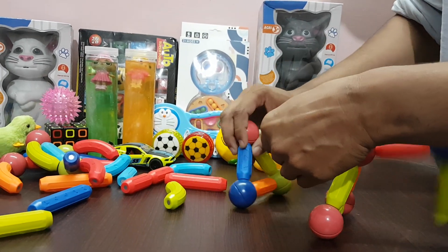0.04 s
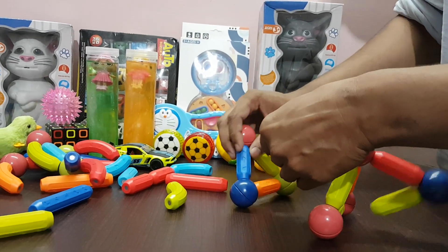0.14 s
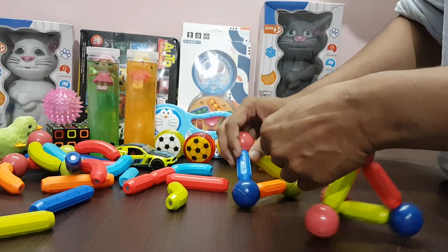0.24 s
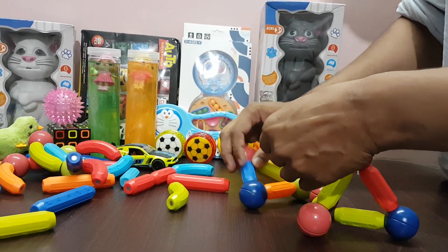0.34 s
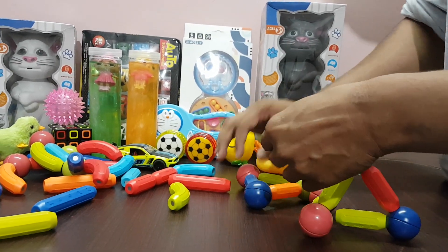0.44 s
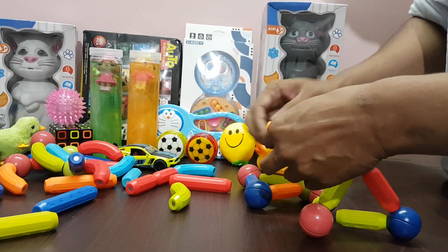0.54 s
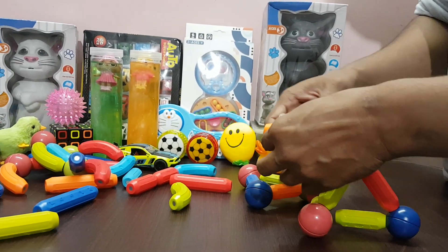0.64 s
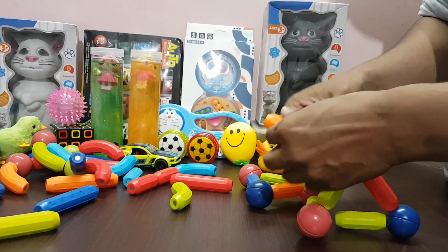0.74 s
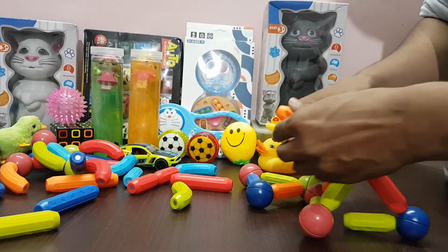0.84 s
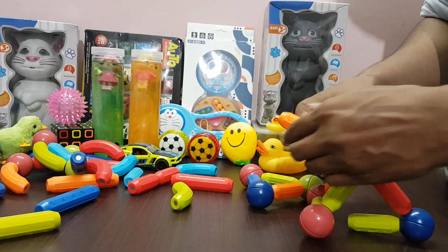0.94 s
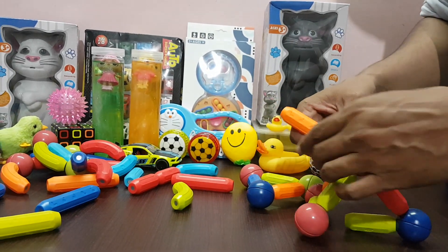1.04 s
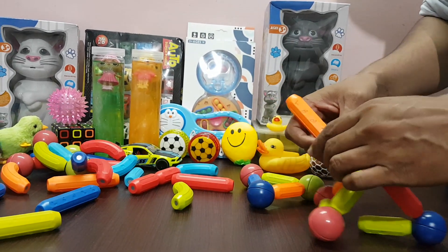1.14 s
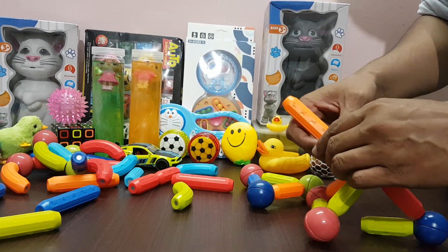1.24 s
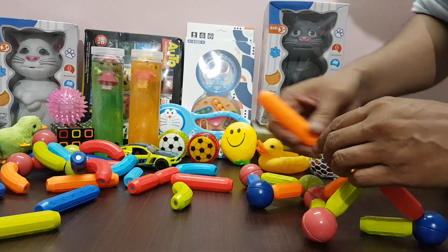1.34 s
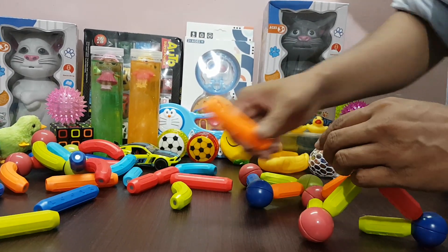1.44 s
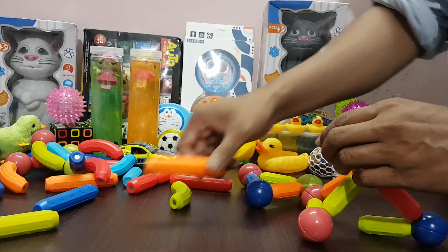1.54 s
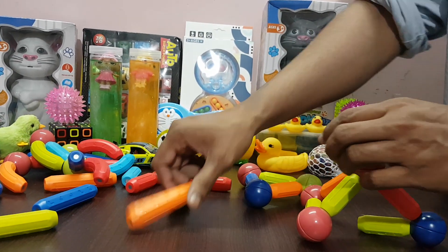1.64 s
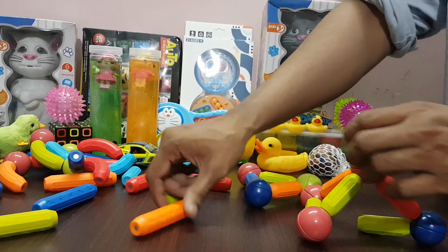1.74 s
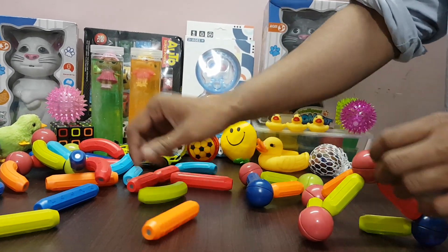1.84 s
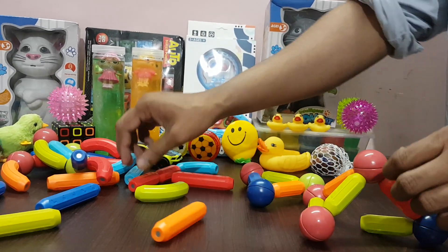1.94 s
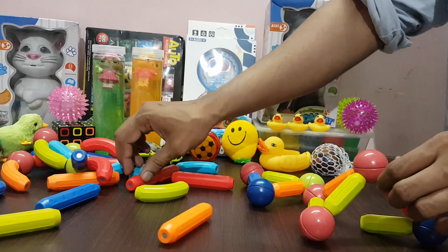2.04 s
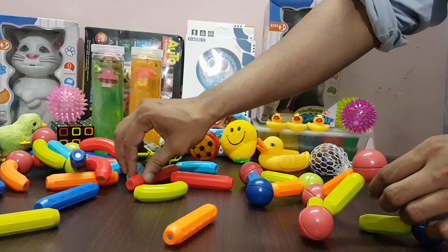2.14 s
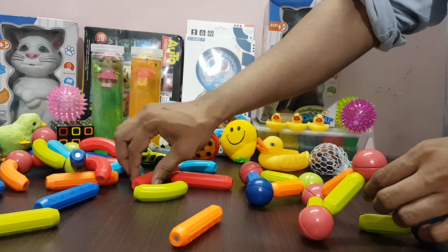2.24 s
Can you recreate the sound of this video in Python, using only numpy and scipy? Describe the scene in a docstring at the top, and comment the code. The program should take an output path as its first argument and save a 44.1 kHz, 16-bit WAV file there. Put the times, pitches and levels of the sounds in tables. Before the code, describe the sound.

Plastic magnetic sticks and balls clack together and knock down on a table. Light ticks and scrapes follow, then a stick drops and bounces with a ping, and more pieces click, close by in a small, faintly humming room.

```python
"""A table in a small room, where hollow plastic sticks and balls with magnets inside are handled.
A frame of them snaps together and knocks down; fingers work a stick loose, it drops, bounces and pings.
Pieces tick and scrape as the hand reaches into the pile, over a faint hum.
Each impact is a noise crack plus ringing modes, each scrape a run of tiny slips; both echo in the room."""
import sys
import numpy as np
from scipy import signal
from scipy.fft import rfft, irfft
from scipy.io import wavfile

SR = 44100
rng = np.random.default_rng(int(sys.argv[2]) if len(sys.argv) > 2 else 0)


def log_audio(samples):
    """Write samples as a 16-bit WAV file to the path given in sys.argv[1]."""
    # one column per channel
    frames = np.atleast_2d(samples).T
    # limit to full scale, then quantise
    limited = np.clip(frames, -1, 1)
    pcm = np.round(limited * 32767).astype(np.int16)
    wavfile.write(sys.argv[1], SR, pcm)


N = 101430

# left-right likeness of the sound field: freq_hz, correlation
COHERENCE = [(60, .99), (180, .94), (350, .85), (700, .7), (1500, .4), (4000, .15), (14000, .2)]


def amp(db):
    """Decibels to gain."""
    return 10 ** (np.asarray(db) / 20)


def unit(x):
    """Scale to rms 1."""
    return x / np.sqrt(np.mean(x ** 2) + 1e-20)


def read(points, hz):
    """Interpolate a table over log frequency."""
    freq_hz, value = np.transpose(points)
    return np.interp(np.log(hz + 1), np.log(freq_hz + 1), value)


def bins(size):
    """Real FFT frequencies in Hz."""
    return np.fft.rfftfreq(size, 1 / SR)


def add(mix, start_s, sound):
    """Mix in a stereo sound, cropped at both ends."""
    at = round(start_s * SR)
    sound = sound[:, max(-at, 0):]
    part = mix[:, max(at, 0):][:, :sound.shape[1]]
    part += sound[:, :part.shape[1]]


def noise_pair(size):
    """Stereo white noise, alike in the bass."""
    left, other = rfft(rng.standard_normal((2, size)))
    likeness = np.clip(read(COHERENCE, bins(size)), 0, 1)
    return irfft([left, likeness * left + np.sqrt(1 - likeness ** 2) * other], size)


def colour(x, gain_db):
    """Minimum-phase filter, one gain per bin."""
    size = x.shape[1]
    cepstrum = irfft(np.log(amp(gain_db)), size)
    cepstrum[..., 1:size // 2] *= 2
    cepstrum[..., size // 2 + 1:] = 0
    return irfft(rfft(x) * np.exp(rfft(cepstrum)), size)


def flatten(x):
    """Whiten the broad spectrum, keep the fine peaks."""
    running_power = np.cumsum((abs(rfft(x)) ** 2).mean(0))
    k = np.arange(len(running_power))
    reach = (k * .08 + 20 * x.shape[1] / SR).astype(int) + 1  # 8 % + 20 Hz each way
    lo, hi = np.maximum(k - reach, 0), np.minimum(k + reach, k[-1])
    mean_power = (running_power[hi] - running_power[lo]) / (hi - lo)
    return colour(x, -10 * np.log10(mean_power + 1e-12))


def hardness_db(low_db, mid_db, treble_db, hz):
    """Hardness of one contact as a smooth gain curve."""
    return read([(250, low_db), (1200, mid_db), (8000, treble_db)], hz)


def background(air_db=-62.5, waver_depth=.25):
    """Soft room air and a wavering low hum."""
    # air spectrum: freq_hz, gain_db
    air = [(20, -15), (60, 0), (100, 4.5), (140, -1), (200, 4.5), (300, -2), (600, -7), (1500, -10),
           (3500, -16.5), (5000, -23), (8000, -22), (9500, -29.5), (16000, -24.5)]
    # hum lines: pitch_hz, level_db
    hum = [(101.5, -60), (202, -68), (258, -69)]
    t, hz = np.arange(N) / SR, bins(N)
    out = amp(air_db) * unit(irfft(rfft(noise_pair(N)) * amp(read(air, hz)), N))
    for pitch_hz, level_db in hum:
        waver = unit(irfft(rfft(rng.standard_normal(N)) * np.exp(-hz / 5), N))
        tone = np.sqrt(2) * np.sin(2 * np.pi * (pitch_hz * t + rng.random()))
        out += amp(level_db) * (1 + waver_depth * waver) * tone
    return out * amp([[-.7], [.7]])


def room(x, onset_s=.011, early_db=-9, early_s=.06, size=32768):
    """Dense echoes off table clutter and walls, each band dying at its own rate."""
    # echo decay: freq_hz, t60_s
    decay = [(70, 0.14), (260, 0.41), (700, 0.31), (1800, 0.26), (5000, 0.28), (13000, .27)]
    # echo spectrum: freq_hz, gain_db
    spectrum = [(70, 2.5), (160, 4.5), (300, 1), (800, -1), (1600, -4.5), (4000, -2), (8000, -7),
                (13000, -8.5)]
    band_hz, frame_s, bands = signal.stft(noise_pair(size), SR, nperseg=256)
    bands = bands * np.exp(-np.log(1000) * frame_s / read(decay, band_hz)[:, None])
    tail = signal.istft(bands, SR, nperseg=256)[1][:, :size]
    t = np.arange(size) / SR
    fade_in = np.clip(2 * t / onset_s - 1, 0, 1)
    early_boost = 1 + amp(early_db) * np.exp(-t / early_s)
    tail = colour(flatten(tail * fade_in * early_boost), read(spectrum, bins(size)))
    return signal.fftconvolve(x, tail, axes=1)[:, :N]


def frame_drags(width_hz=91, size=16384):
    """Friction keeps a low resonance of the pushed frame murmuring."""
    # pushes across the table: start_s, length_s, pitch_hz, level_db
    pushes = [(-.03, 0.25, 280.5, -47.5), (0.218, 0.042, 273, -49), (0.619, 0.27, 265, -58),
              (1.167, 0.19, 319, -54.5), (1.431, 0.091, 400, -58.5)]
    out, t = np.zeros((2, N)), np.arange(size) / SR
    for start_s, length_s, pitch_hz, level_db in pushes:
        resonance = 1 / (1 + (2 * (bins(size) - pitch_hz) / width_hz) ** 2)
        murmur = unit(irfft(rfft(noise_pair(size)) * resonance, size))
        swell = np.sqrt(abs(np.sin(np.pi * np.minimum(t / length_s, 1))))
        add(out, start_s, amp(level_db) * murmur * swell)
    return out


def piece_scrapes(rise_s=.024, fall_s=.0088, slips_per_s=1500, spread_db=2.5, size=32768):
    """Plastic slides on the table and on other pieces in tiny, uneven slips."""
    # slides: start_s, length_s, low_db, mid_db, treble_db
    slides = [(-.02, 0.17, -25.5, -35.5, -56), (0.228, 0.41, -26.5, -43, -51), (.62, 0.3, -32, -42, -69.5),
              (0.913, 0.043, -26.5, -31, -69), (0.867, 0.064, -29.5, -37, -69), (.98, 0.18, -33, -47, -73),
              (1.16, 0.076, -19, -30, -52.5), (1.259, .09, -36, -41.5, -70),
              (1.897, 0.08, -26.5, -31.5, -44), (2.065, 0.039, -38.5, -12.5, -42),
              (2.17, 0.012, -19.5, -24, -54), (2.254, .06, -21.5, -19, -45)]
    # scrape spectrum: freq_hz, gain_db
    spectrum = [(30, -30), (130, -21), (290, -6.5), (500, -7), (900, -7), (1170, -6), (1400, -7),
                (1600, -4.5), (2100, -10.5), (3100, -7.5), (3650, -9), (4300, -14), (7500, -9),
                (10000, -21.5), (16000, -21)]
    out, t, hz = np.zeros((2, N)), np.arange(size) / SR, bins(size)
    for start_s, length_s, low_db, mid_db, treble_db in slides:
        slips = rng.random(size) < slips_per_s / SR
        strength = amp(spread_db * np.minimum(rng.exponential(1, size), 4))
        shell = flatten(noise_pair(size) * np.exp(-t / .002))
        impulses = slips * strength * rng.choice([-1, 1], size)
        grain = unit(irfft(rfft(impulses) * rfft(shell)))
        stroke = np.minimum(t / rise_s, 1) * np.exp(-np.maximum(t - length_s, 0) / fall_s)
        gain_db = read(spectrum, hz) + hardness_db(low_db, mid_db, treble_db, hz)
        add(out, start_s, colour(grain * stroke, gain_db))
    return out * amp([[-1.2], [1.2]])


def crack(rise_s, crack_s, body_s, size, crossover_hz=2780):
    """Dense modes of a hollow shell: the highs die at once, the low body a little later."""
    t, white = np.arange(size) / SR, rfft(noise_pair(size))
    highpass = 1 / (1 + (crossover_hz / (bins(size) + 1)) ** 4)
    top = irfft(white * highpass, size) * np.exp(-t / crack_s)
    body_envelope = (1 - np.exp(-t / rise_s)) * np.exp(-(t / body_s) ** 2)
    body = irfft(white * (1 - highpass), size) * body_envelope
    return flatten(top / np.sqrt(crack_s) + body / np.sqrt(body_s))


def rings(modes, size, detune=.005):
    """Decaying tones of one blow; each blow lands elsewhere and detunes them slightly."""
    t, out = np.arange(size) / SR, np.zeros((2, size))
    for pitch_hz, gain_db, t60_s in modes:
        apart_rad = rng.uniform(-np.pi, np.pi) * (1 - np.clip(read(COHERENCE, pitch_hz), 0, 1))
        turns = pitch_hz * (1 + detune * rng.standard_normal()) * t + rng.random()
        ring = np.sin(2 * np.pi * turns + np.array([[0], [apart_rad]]))
        ring *= np.exp(-np.log(1000) * t / t60_s)
        out += amp(gain_db) * ring / np.linalg.norm(ring[0])
    return out


def strikes(blows, spectrum, modes, rise_s, crack_s, body_s, ring_db, left_lag_ms, size=32768):
    """Each blow is a crack plus longer rings, coloured by how hard it lands."""
    out, hz = np.zeros((2, N)), bins(size)
    for start_s, low_db, mid_db, treble_db, pan_left_db, *_ in blows:
        hit = crack(rise_s, crack_s, body_s, size) + amp(ring_db) * rings(modes, size)
        hit = colour(hit, read(spectrum, hz) + hardness_db(low_db, mid_db, treble_db, hz))
        add(out, start_s, hit * amp([[pan_left_db / 2], [-pan_left_db / 2]]))
    delay_s = np.array([[left_lag_ms], [-left_lag_ms]]) / 2000
    return irfft(rfft(out) * np.exp(-2j * np.pi * bins(N) * delay_s), N)


def piece_ticks():
    """Pieces touch lightly and ring."""
    # touches: start_s, low_db, mid_db, treble_db, pan_left_db
    touches = [(.7235, -24.5, -20.5, -29, -5), (.9255, -32, -25, -45, -5), (1.0605, -16, -29, -28, -8),
               (1.1630, -26, -15, -33, -6), (1.1835, -20, -26, -29, -5), (1.5250, -42, -32.5, -33.5, -9),
               (1.9865, -25.5, -29, -25, -7), (2.0660, -13, -21, -25, 1), (2.1078, -12.5, -7, -5.5, -1.5),
               (2.2117, -12, -12, -13, 2), (2.2530, -29, -7, -20, -4)]
    # tick spectrum: freq_hz, gain_db
    spectrum = [(30, -11), (300, 7.5), (1200, 3), (2300, 4.5), (3600, -1.5), (4400, -2), (7500, -2),
                (10000, -16), (13000, -10), (16000, -12)]
    # piece resonances: pitch_hz, gain_db, t60_s
    modes = [(1130, -10.5, .06), (3467, -9, 0.052), (3756, -12, .09), (4980, -15, 0.068), (7430, -11, .07)]
    return strikes(touches, spectrum, modes,
                   rise_s=.00074, crack_s=.0029, body_s=.011, ring_db=-8.5, left_lag_ms=-.12)


def stick_drop(spin_hz=27, spin_depth=.5, size=32768):
    """A loose stick bounces; its bending modes ping, most on the last bounce, and throb as it rolls."""
    # landings: start_s, low_db, mid_db, treble_db, pan_left_db, bend_db
    bounces = [(1.7373, 8, 14, 8, -0.5, -8), (1.7882, 0, 1.5, 3, .5, -10),
               (1.8060, -6, 11, -6.5, -3.5, -11), (1.8327, 4, 4.5, 6, -3, -0.5)]
    # landing spectrum: freq_hz, gain_db
    spectrum = [(30, -19), (150, -5.5), (600, 0), (1300, -1.5), (2300, 1.5), (4100, -8.5), (6300, -9),
                (7700, 6.5), (9700, -18), (12000, -1), (12700, -7), (14300, -17), (15600, -18)]
    # stick resonances: pitch_hz, gain_db, t60_s
    modes = [(603, -13, 0.081), (2410, -15, 0.022), (7670, -14.5, 0.04), (7980, -11, .09),
             (8030, -19, 0.12), (11950, -9.5, 0.031)]
    # bending of the free stick: pitch_hz, gain_db, t60_s
    bend_modes = [(3290, -20, .45), (3440, -13, .19), (3570, -17, .15), (6450, -24, .5)]
    clatter = strikes(bounces, spectrum, modes,
                      rise_s=.00042, crack_s=.0031, body_s=.0046, ring_db=-10.5, left_lag_ms=-.12)
    ping, t = np.zeros((2, N)), np.arange(N) / SR
    for start_s, *_, bend_db in bounces:
        add(ping, start_s, amp(bend_db) * rings(bend_modes, size))
    throb = 1 + spin_depth * np.sin(2 * np.pi * (spin_hz * t + rng.random((2, 1))))
    return clatter + ping * throb


def ball_knocks():
    """Hollow balls hit the table and ring."""
    # table hits: start_s, low_db, mid_db, treble_db, pan_left_db
    hits = [(.4757, 22.5, 28, -3, 0.5), (.4927, 12, 13, -24.5, 2), (.4992, 9, 16, -17, -14.5),
            (.5258, 12, 15, -15, -2.5), (.5495, 3, 3.5, -28, -14), (2.2402, -3, 11.5, -24, -2.5),
            (2.2635, -8, 2, -24, -3)]
    # knock spectrum: freq_hz, gain_db
    spectrum = [(30, -34.5), (80, 4.5), (150, -3), (300, -2), (850, -5.5), (1450, -3.5), (1850, -1),
                (2800, -1.5), (5000, -3.5), (7300, 1), (9500, -5), (12800, 1.5), (15500, -13)]
    # ball resonances: pitch_hz, gain_db, t60_s
    modes = [(250.3, -13.5, 0.27), (428.4, -21, .2), (620.5, -13.5, .12), (828, -7, 0.028),
             (973, -12.5, 0.044), (1150, -14.5, 0.083), (1213, -9.5, 0.073), (1764, -5, 0.011),
             (1940, -10, 0.039), (7260, -12, 0.047)]
    return strikes(hits, spectrum, modes,
                   rise_s=.0001, crack_s=.0034, body_s=.0064, ring_db=-8.5, left_lag_ms=.082)


def magnet_snaps():
    """Magnets snap together and set the frame ringing."""
    # magnet contacts: start_s, low_db, mid_db, treble_db, pan_left_db
    contacts = [(.1615, 27, 22.5, 5.5, -3.5), (.3114, 3.5, 6.5, -3.5, -3.5), (.3481, 17.5, 5.5, 7.5, -3.5),
                (.3604, 5.5, 17.5, -23, 7)]
    # snap spectrum: freq_hz, gain_db
    spectrum = [(30, -38), (70, 0.5), (150, -6.5), (310, -1), (450, 3), (580, -0.5), (800, -2),
                (1000, -4.5), (1170, -5.5), (1380, -3), (1600, 4), (1850, -5.5), (2200, -2), (2750, -5.5),
                (3350, 1.5), (4300, -6.5), (6500, -1), (10000, -6.5), (13000, -6), (16000, -13.5)]
    # frame resonances: pitch_hz, gain_db, t60_s
    modes = [(303.8, -7.5, 0.089), (581.7, -13, .14), (793, -4.5, 0.025), (1141, -5.5, 0.091),
             (1500, -15.5, 0.081), (1600, -8.5, 0.038), (2130, -12, 0.052), (2170, -7, 0.063),
             (3124, -2.5, 0.045), (3820, -15, .04), (7960, -8, .2)]
    return strikes(contacts, spectrum, modes,
                   rise_s=.00095, crack_s=.0024, body_s=.0045, ring_db=-13.5, left_lag_ms=.085)


def scene():
    """Impacts and scrapes with their echoes, over the drags and background."""
    # stereo balance of the direct sound: freq_hz, pan_left_db
    balance = [(100, 1.5), (1000, -1), (2500, 1), (5000, 0.5), (8000, 4), (13000, 9)]
    snaps = magnet_snaps()
    knocks = ball_knocks()
    stick = stick_drop()
    ticks = piece_ticks()
    scrapes = piece_scrapes()
    room_send = (amp(-2) * snaps + amp(-1.34) * knocks + amp(.55) * stick
                 + amp(-.1) * ticks + amp(-5.5) * scrapes)
    channel_db = read(balance, bins(N)) * np.array([[.5], [-.5]])
    direct = colour(snaps + knocks + stick + ticks + scrapes, channel_db)
    return direct + room(room_send) + frame_drags() + background()


def record(dry, cutoff_hz=16300):
    """Steep low-pass band limit."""
    lowpass = signal.firwin(301, cutoff_hz, window=("kaiser", 9), fs=SR)
    return signal.oaconvolve(dry, lowpass[None], "same")


dry = scene()
out = record(dry)
log_audio(out)
```